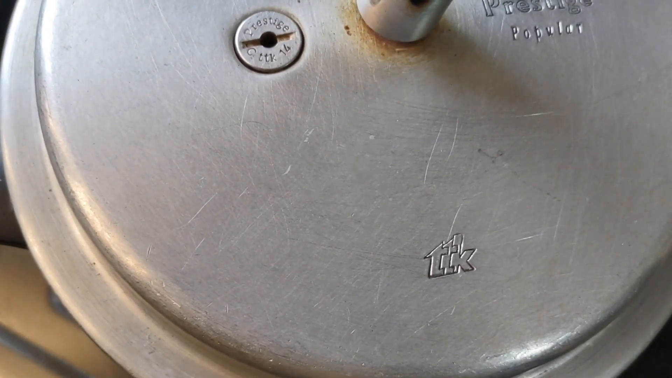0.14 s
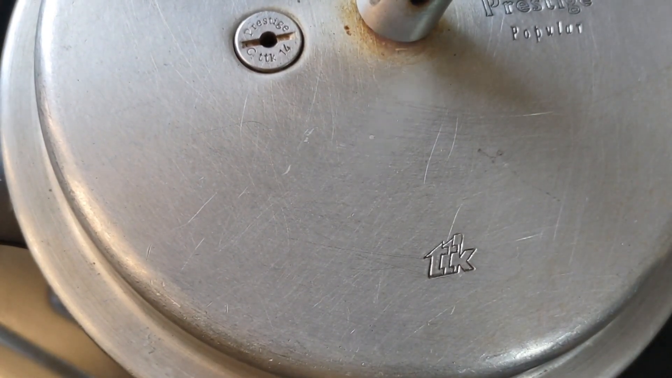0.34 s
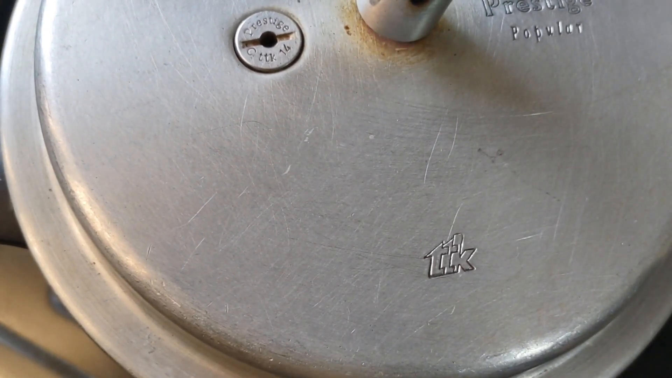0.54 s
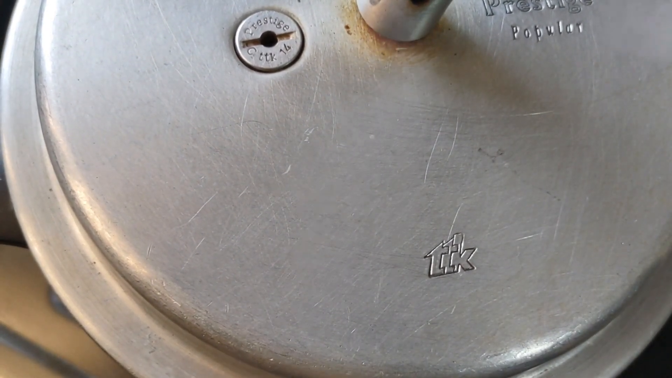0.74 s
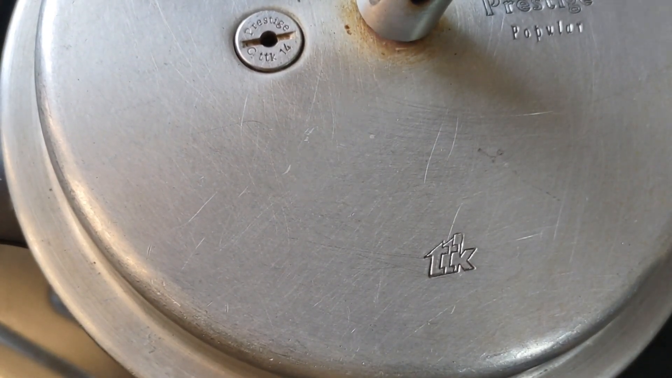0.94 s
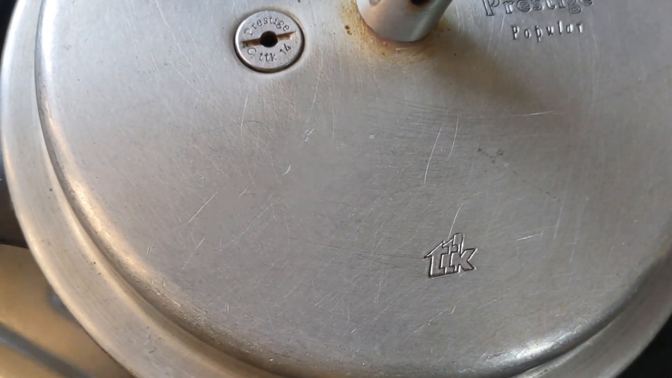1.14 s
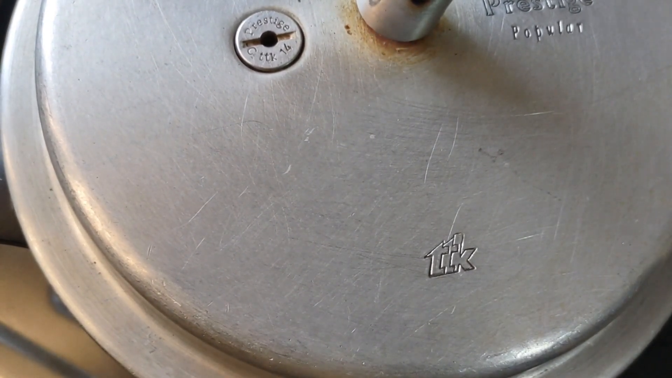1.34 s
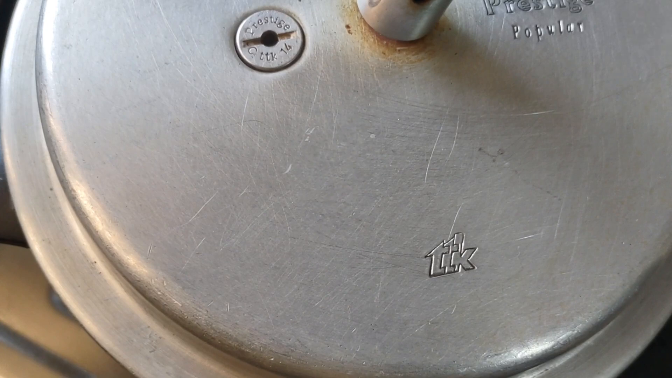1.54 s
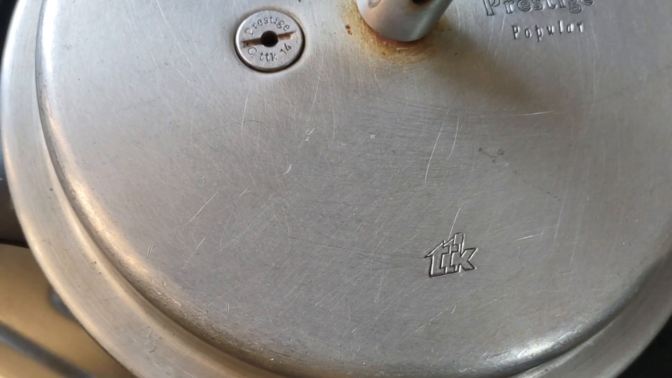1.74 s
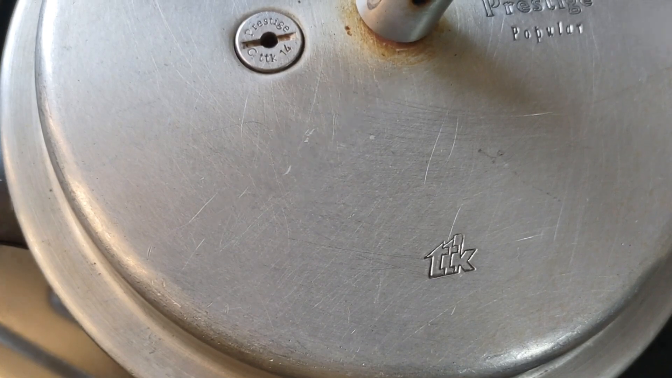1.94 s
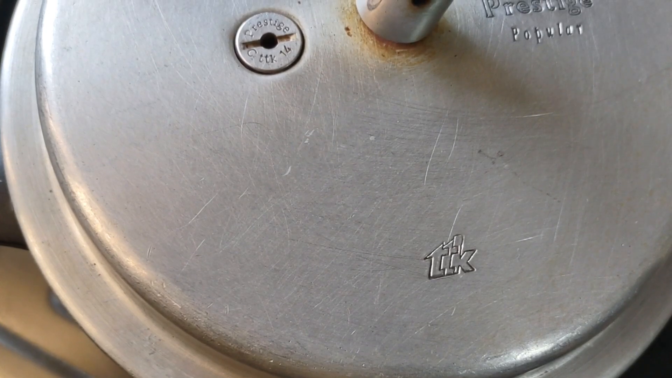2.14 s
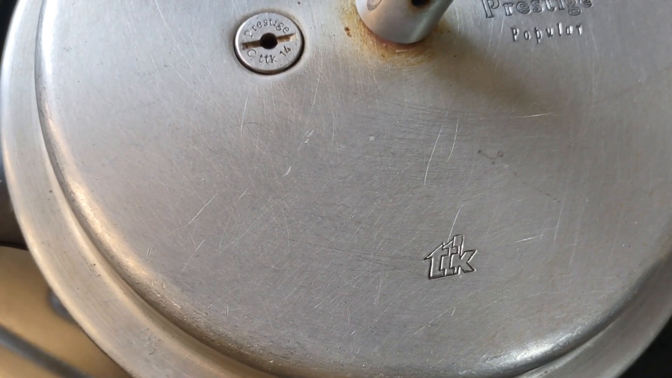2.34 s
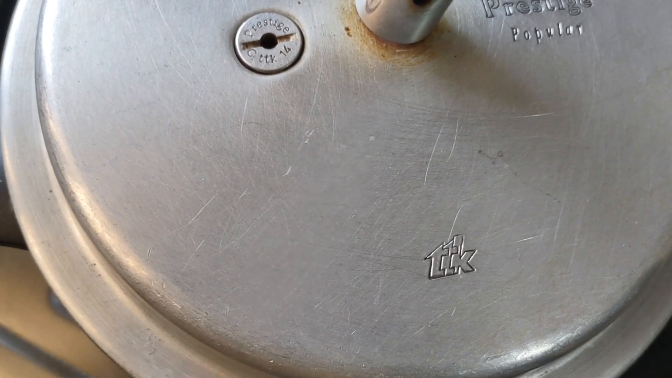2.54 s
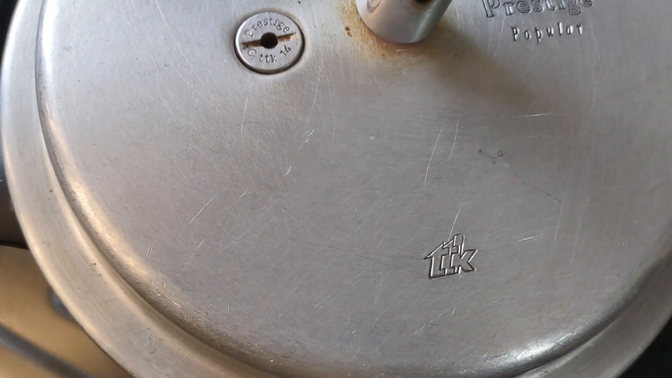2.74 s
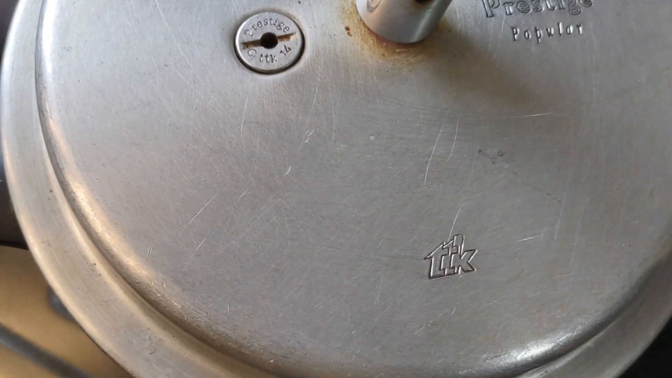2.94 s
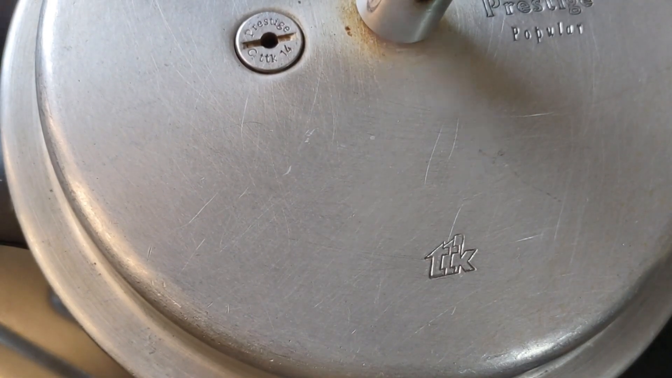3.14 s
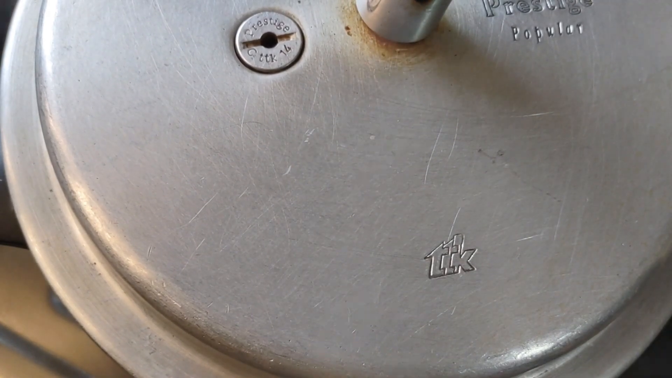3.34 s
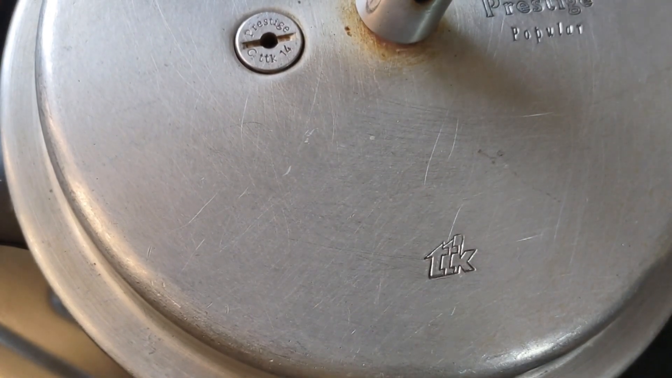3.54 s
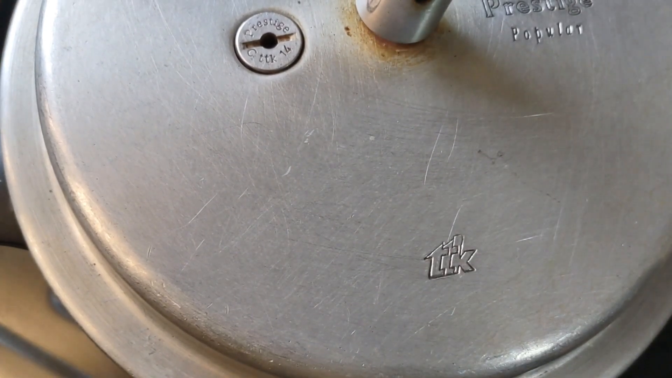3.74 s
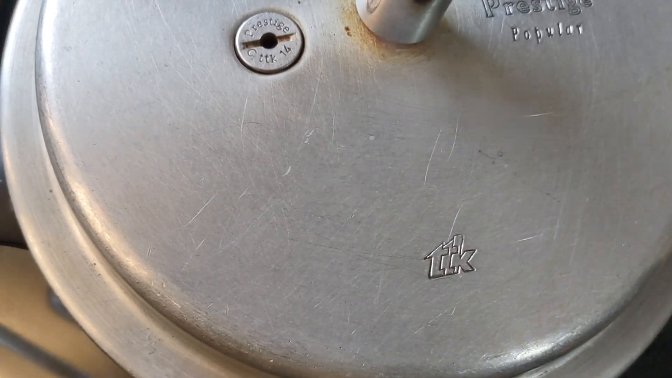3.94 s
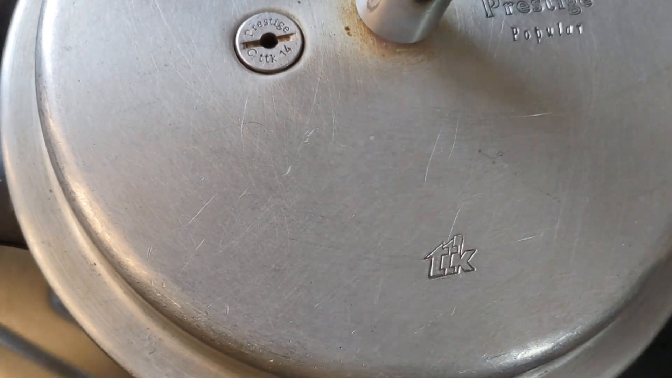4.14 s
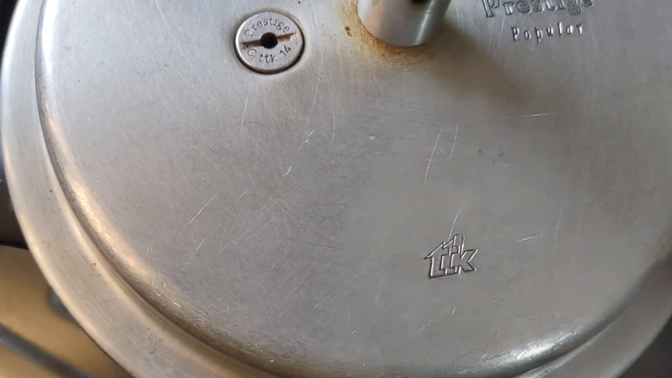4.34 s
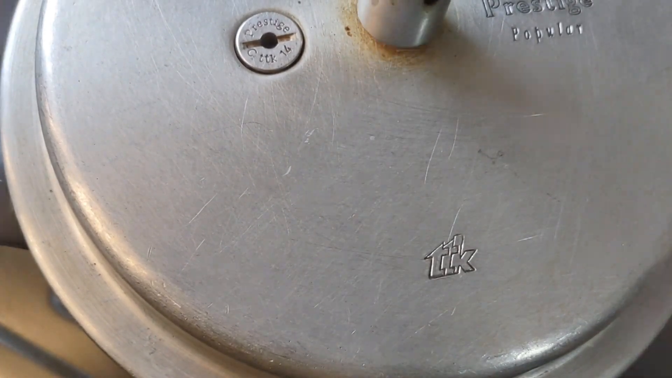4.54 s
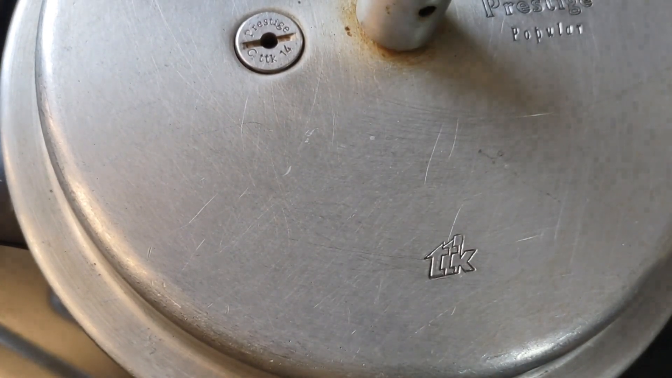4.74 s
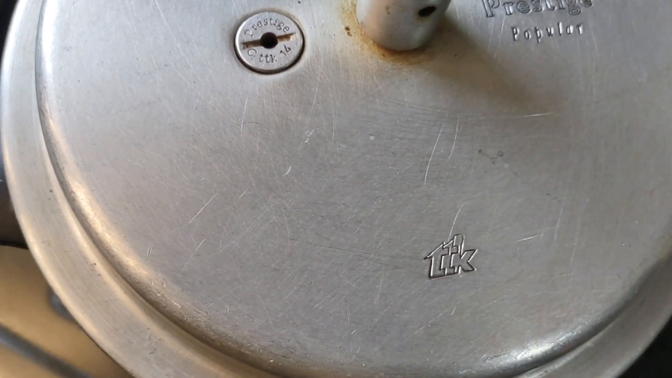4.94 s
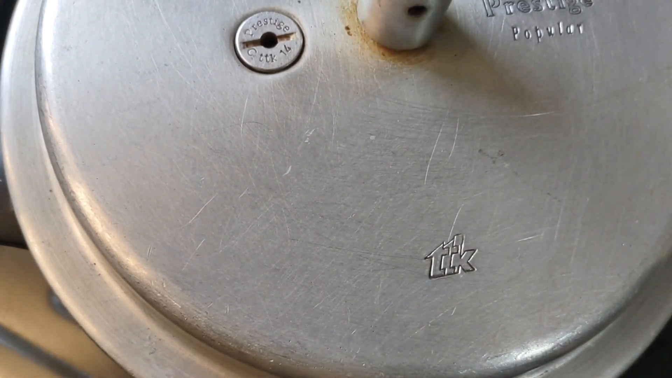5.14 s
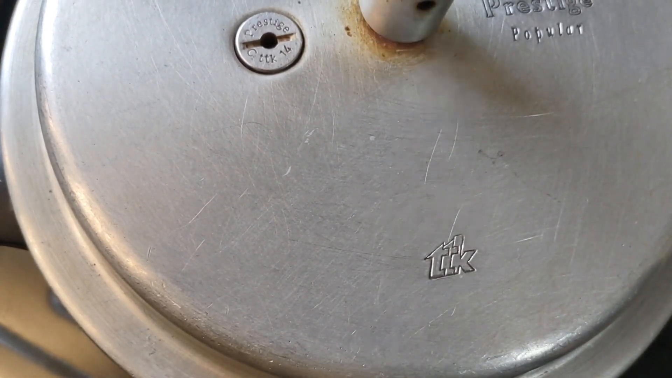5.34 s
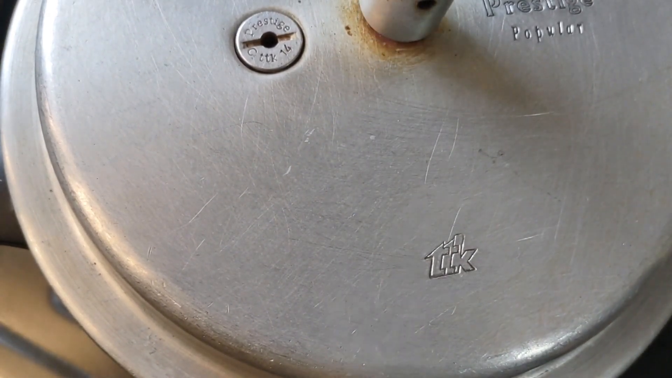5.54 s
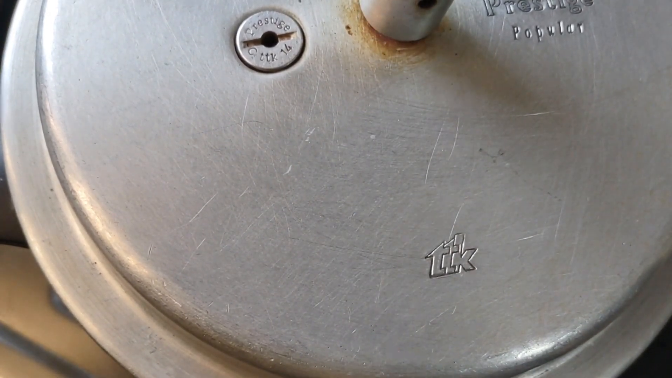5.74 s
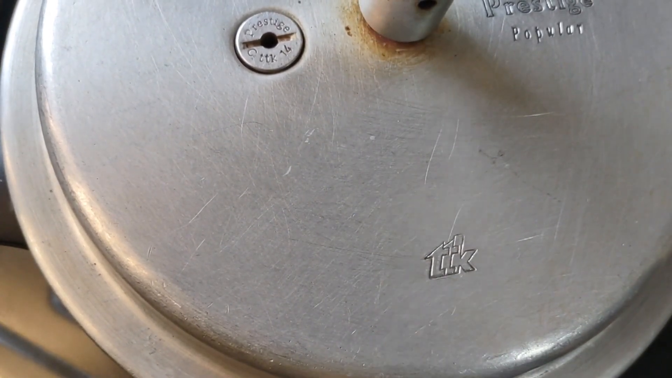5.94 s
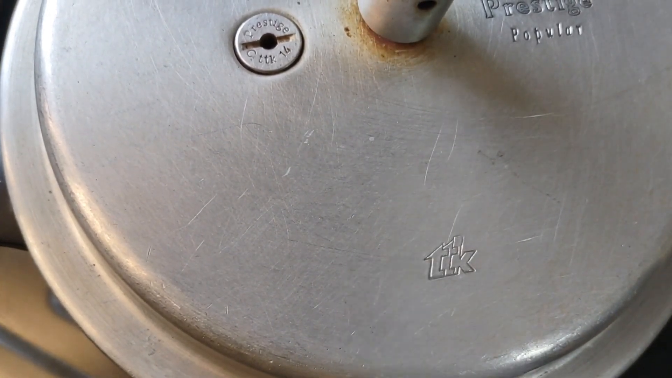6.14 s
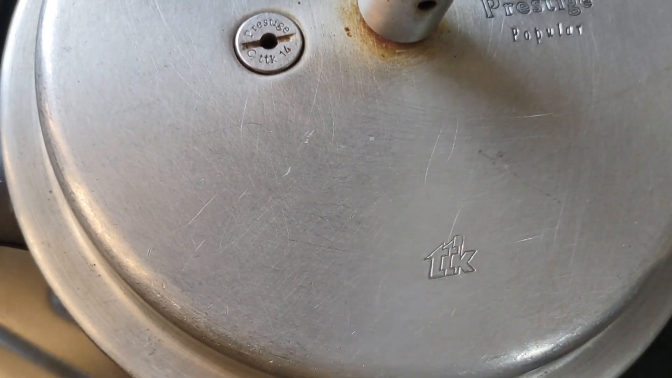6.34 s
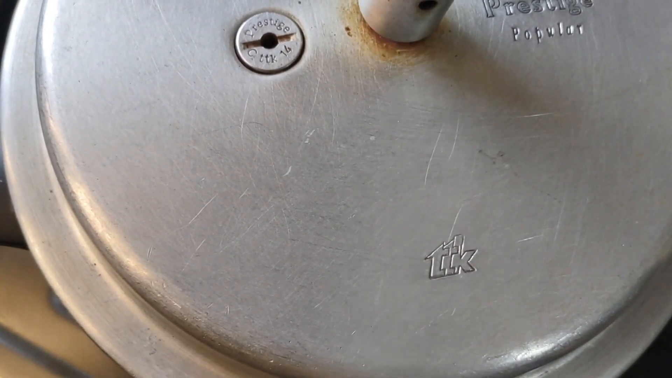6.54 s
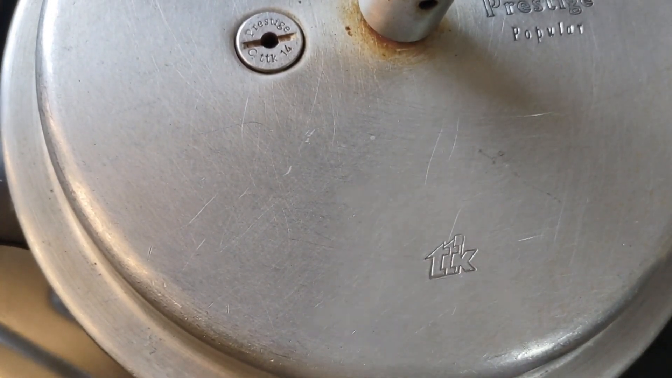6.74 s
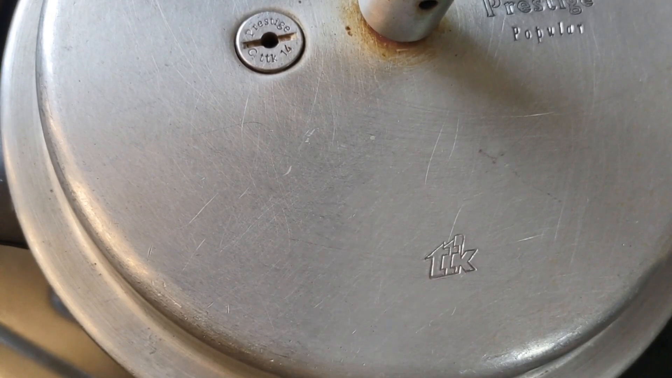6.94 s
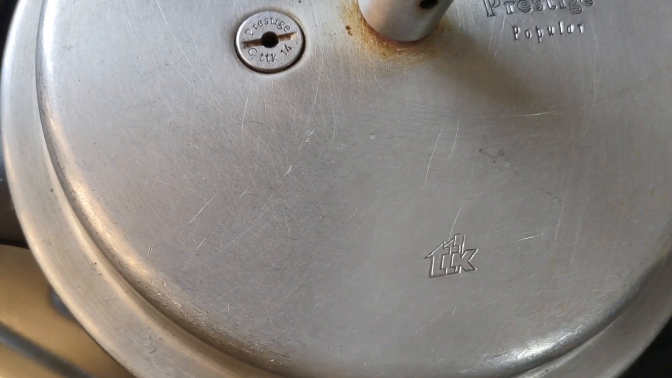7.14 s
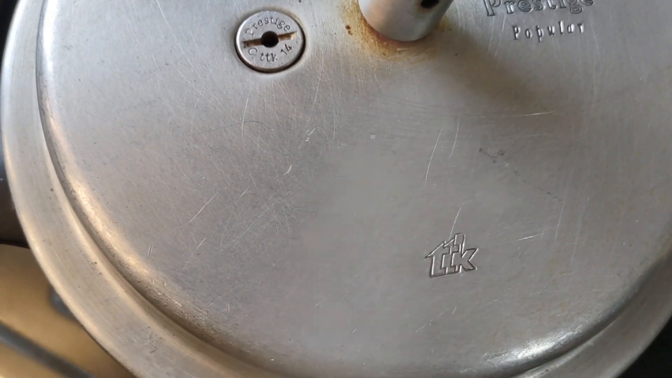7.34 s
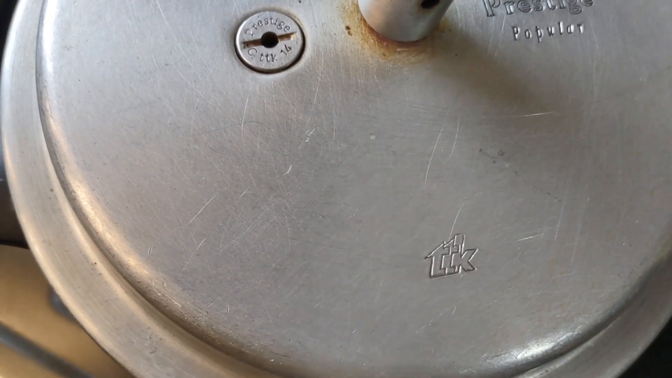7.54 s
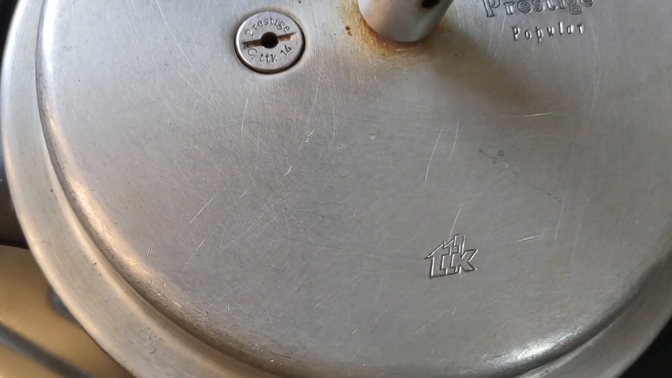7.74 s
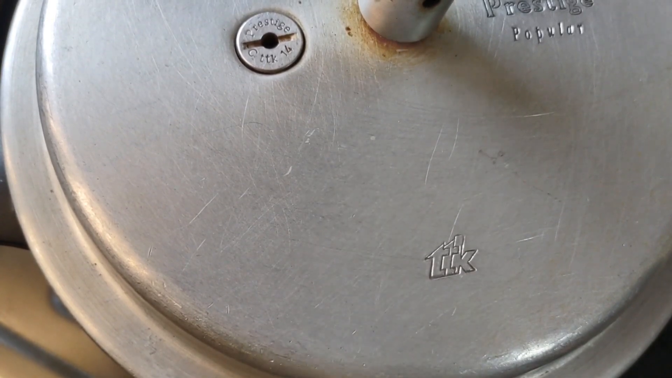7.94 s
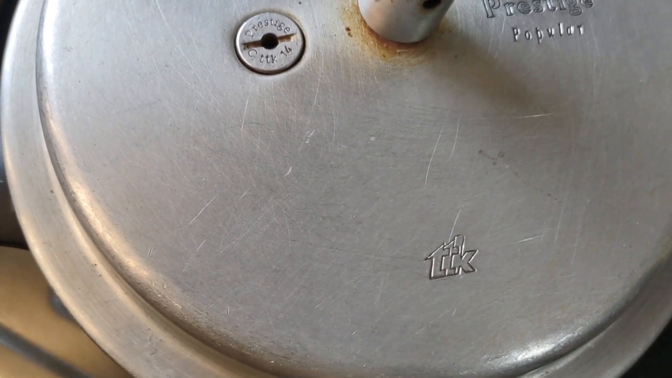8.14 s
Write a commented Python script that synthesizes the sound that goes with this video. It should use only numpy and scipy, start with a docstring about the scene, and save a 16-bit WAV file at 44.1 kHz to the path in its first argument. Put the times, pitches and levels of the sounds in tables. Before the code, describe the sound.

Close to a pressure cooker in a small hard-walled kitchen, steam roars loudly and steadily while low gusts bump the microphone. The roar gradually thins into a shrill, ringing hiss, then shuts off sharply with a soft hollow puff. A lull of about half a second holds only low stove and room rumble, before a fine leak hisses up and the full roar bursts back until the end.

```python
"""A broad steam roar, bumped by stray gusts, thins to a shrill hiss and falls away with a hollow puff. The
sound goes quiet for a moment; then a fine leak builds and the roar bursts back: a pressure cooker in a small
kitchen. Steam is shaped noise: the gap under the weight trades roar for hiss and ringing, a vent envelope
chokes it. Gusts are short low noise bumps, the stove and room a low rumble; hard walls add a short dense tail."""
import sys
import numpy as np
from scipy import signal
from scipy.fft import rfft, irfft
from scipy.io import wavfile

SR = 44100
rng = np.random.default_rng(int(sys.argv[2]) if len(sys.argv) > 2 else 0)


def wav_out(sig):
    """Save sig, one row per channel (or a flat mono array), as 16-bit PCM at SR to the path in sys.argv[1]."""
    wavfile.write(sys.argv[1], SR, np.round(np.clip(np.atleast_2d(sig).T, -1, 1) * 32767).astype(np.int16))


N = 365148
TIME = np.arange(N) / SR
FREQ = np.arange(N // 2 + 1) * SR / N + 1e-3  # offset keeps log finite
SIDES = np.array([[1], [-1]]) / 2  # splits a left-minus-right dB between the two ports
SHUT_S, OPEN_S = 4.712, 5.405  # weight drops, weight pops up


def undb(db):
    """Decibels to gain."""
    return 10 ** (np.asarray(db) / 20)


def curve(rows):
    """Time table interpolated to every sample."""
    time_s, value = np.transpose(rows)
    return np.interp(TIME, time_s, value)


def colour(points):
    """Spectral gain from (frequency [Hz], level [dB]) points, linear in log frequency."""
    hz, db = np.transpose(points)
    return undb(np.interp(np.log(FREQ), np.log(hz), db))


def bell(hz, width_hz):
    """Shape of one resonance, 1 at its centre, about width_hz wide at half power."""
    return 1 / (1 + ((FREQ - hz) / (.75 * width_hz)) ** 2)


def ringing(modes):
    """Gain of a set of resonances alone."""
    return sum(undb(db) * bell(hz, width_hz) for hz, width_hz, db in modes)


def lift(modes):
    """Gain of gentle resonances on an otherwise flat response."""
    return undb(sum(db * bell(hz, width_hz) for hz, width_hz, db in modes))


def filtered(x, gain):
    """Apply a spectral gain."""
    return irfft(rfft(x) * gain, N)


def turbulence(gain):
    """Coloured noise, unrelated at the two ports; their mean has rms 1."""
    x = filtered(rng.standard_normal((2, N)), gain)
    return x / np.std(x.mean(axis=0))


def walk(rate_hz):
    """Smooth random wander up to about rate_hz, spread 1."""
    x = filtered(rng.standard_normal(N), 1 / (1 + (FREQ / rate_hz) ** 2))
    return x / np.std(x)


def swell(peak_s, attack_s, release_s):
    """Envelope that grows and dies exponentially, 1 at its peak."""
    return np.exp(-np.maximum((peak_s - TIME) / attack_s, (TIME - peak_s) / release_s))


def hump(centre_s, width_s):
    """Gaussian rise and fall, 1 at its centre."""
    return np.exp(-((TIME - centre_s) / width_s) ** 2)


# rumble spectrum: (frequency [Hz], relative level [dB])
RUMBLE_SPECTRUM = [(25, -23), (60, -7), (100, 2), (200, -7), (320, -11), (400, -10), (600, -12),
                   (1000, -13.5), (3000, -24), (6000, -34), (15000, -51)]
# low room resonances, also coupled to the jet: (frequency [Hz], width [Hz], lift [dB])
ROOM_RESONANCES = [(169, 30, 0.5), (253, 32, 7), (378, 41, 7.5), (562, 55, 8.5)]
# air stirred by each blast: (peak time [s], level [dB])
STIRRED_AIR = [(0, -40.5), (5.55, -44.5)]


def rumble(level_db=-54, wander_db=0.5, stir_s=.1, settle_s=0.88):
    """Low noise of the stove and the room, stronger while a fresh blast stirs the air."""
    noise = turbulence(colour(RUMBLE_SPECTRUM) * lift(ROOM_RESONANCES))
    stirred = sum(undb(db) * swell(at_s, stir_s, settle_s) for at_s, db in STIRRED_AIR)
    return noise * (undb(level_db) + stirred) * undb(wander_db * walk(6))


# gusts: (time [s], level at left port [dB], length [s], centre [Hz])
GUST_BUMPS = [(0.0, -28, .03, 95), (0.06, -26.5, 0.024, 90), (0.136, -33, .029, 185),
              (0.197, -25.5, 0.026, 140), (0.287, -30, .033, 140), (0.507, -28, 0.019, 100),
              (0.608, -24, 0.027, 144), (0.801, -26, .015, 165), (0.956, -28.5, 0.042, 131),
              (1.015, -33, 0.032, 100), (1.095, -32, .03, 95), (2.66, -37, 0.047, 110),
              (4.017, -28, 0.039, 112), (4.567, -38, .07, 95), (5.809, -34, 0.032, 135)]


def gusts(band_ratio=1.49, right_db=-11):
    """Moving air bumps the microphone: short low-band noise, mostly on the left port."""
    out = np.zeros((2, N))
    for start_s, db, length_s, hz in GUST_BUMPS:
        first = int(start_s * SR)
        age = TIME[:SR // 2] / (length_s / 2)  # in units of half the length
        band = signal.butter(2, [hz / band_ratio, hz * band_ratio], "band", fs=SR, output="sos")
        puffed = rng.standard_normal((2, len(age))) * age * np.exp(1 - age)
        air = signal.sosfilt(band, puffed)
        # level = mean power over the gust length
        rms = np.sqrt(np.sum(air ** 2, axis=1, keepdims=True) / (length_s * SR))
        out[:, first:first + len(age)] += undb(db) * air / rms
    return out * undb([[0], [right_db]])


def kitchen(x, t60_s=0.18, treble_t60_s=0.038, split_hz=5000, wet_db=-9):
    """Hard walls close by add a short dense tail, different at each port; its treble dies first."""
    size = SR // 2
    age_s, noise = TIME[:size], rng.standard_normal((2, size))
    decay = undb(-60 * age_s / t60_s)
    low = signal.sosfilt(signal.butter(2, split_hz, fs=SR, output="sos"), noise)
    high = signal.sosfilt(signal.butter(2, split_hz, "high", fs=SR, output="sos"), noise[::-1])
    tail = low * decay + high * undb(-60 * age_s / treble_t60_s)
    tail = tail * (age_s > .003) / np.sqrt(np.sum(decay ** 2))
    return x + undb(wet_db) * signal.fftconvolve(x, tail, axes=1)[:, :N]


# leak spectrum: (frequency [Hz], relative level [dB])
LEAK_SPECTRUM = [(200, -26), (1200, -18), (2700, -11), (4000, -10.5), (4800, -9), (6300, 0.5), (7600, -5.5),
                 (8900, 0.5), (10800, -6.5), (13000, -6.5), (15500, -6)]
# breathy tone of the seat: (frequency [Hz], width [Hz], relative level [dB])
SEAT_TONE = [(3450, 200, 0)]


def leak(start_s=5.105, creep_db=-33.3, spit_db=-36, lift_off_db=-24, pan_db=-4.0, tone_db=-14):
    """Steam creeps through the closed seat: it spits, sags, and builds until the weight lifts."""
    seep = turbulence(colour(LEAK_SPECTRUM)) * undb(pan_db * SIDES)
    tone = turbulence(ringing(SEAT_TONE)) * undb(tone_db) * hump(5.17, width_s=0.062)
    creep = undb(creep_db) * swell(start_s, attack_s=.005, release_s=.6) * (TIME < OPEN_S)
    spit = undb(spit_db) * swell(start_s, attack_s=.005, release_s=.015)
    lift_off = undb(lift_off_db) * swell(OPEN_S - 0.013, attack_s=.045, release_s=0.024)
    sputter_db = 1.0 * walk(30)
    return (seep + tone) * (creep + spit + lift_off) * undb(sputter_db)


# hollow of the weight: (frequency [Hz], width [Hz], relative level [dB])
HOLLOW_RESONANCES = [(850, 83, 1), (1370, 140, -1), (1960, 150, -9)]


def puff(level_db=-27, pan_db=3, delay_s=0.023):
    """The last steam rings the hollow of the weight as it drops."""
    envelope = swell(SHUT_S + delay_s, attack_s=.018, release_s=0.022)
    return turbulence(ringing(HOLLOW_RESONANCES)) * envelope * undb(level_db + pan_db * SIDES)


def vent(shut_db_per_s=420, open_db_per_s=720):
    """Steam gain: full, choked as the weight drops, full again once it pops up."""
    closing = undb(-shut_db_per_s * np.maximum(TIME - SHUT_S, 0))
    opening = undb(-open_db_per_s * np.maximum(OPEN_S - TIME, 0))
    return np.maximum(closing, opening)


# flow through the vent: (time [s], level [dB])
FLOW_LEVEL = [(0.2, 0), (1.2, -0.3), (2.2, .4), (2.45, -0.1), (3.28, -0.5), (3.45, 0.5), (3.9, -1.2),
              (4.65, 0.2), (5.6, 0), (6.9, .2), (7.2, -.7), (7.65, .4)]
# short surges of steam: (time [s], extra level [dB])
STEAM_SURGES = [(0.82, 1.5), (1.56, 0.8), (2.22, 2), (2.28, 1), (2.78, 1), (2.85, 1), (3.37, 1),
                (4.45, 1.8), (4.67, 0.5), (5.425, 2), (6.84, 2.4), (6.92, 2), (7.7, 2.8), (7.96, 1.5)]


def flow_db(surge_width_s=0.015, flutter_db=0.5):
    """Flow strength: the weight rocks on its seat and shakes the whole flow."""
    surges = sum(db * hump(at_s, surge_width_s) for at_s, db in STEAM_SURGES)
    return curve(FLOW_LEVEL) + surges + flutter_db * walk(11.6)


# jet spectra: (frequency [Hz], relative level [dB])
ROAR_SPECTRUM = [(30, -40), (90, -20), (230, -14.5), (330, -17), (600, -12.5), (1100, -7.5), (2000, -4),
                 (3000, 0.5), (5000, 0), (7900, 1), (8700, -7), (11000, -17), (13500, -17.5),
                 (15700, -13.5)]
HISS_SPECTRUM = [(60, -25), (500, -20.5), (1000, -17), (2000, -9.5), (3300, -3), (5200, -1), (6500, 1),
                 (7600, 1.5), (8600, -6.5), (10400, -9), (11200, -13), (13500, -14), (15700, -10.5)]
# weight and lid, gap ringing, top sizzle: (frequency [Hz], width [Hz], level [dB])
BODY_RESONANCES = [(820, 87, 3), (1284, 170, 2.5), (1807, 163, 4.5), (2280, 70, 3.5), (2500, 58, 3.5),
                   (3220, 140, 1.5)]
GAP_RINGING = [(4530, 200, -13), (5260, 200, -9), (6400, 240, 0.5), (6780, 480, 1.5), (7450, 260, -9),
               (9600, 770, -11), (10200, 450, -9)]
SIZZLE_BANDS = [(14300, 400, -9), (15350, 650, 0)]
# top sizzle: (time [s], level [dB])
SIZZLE_CURVE = [(0, -52), (2.6, -56), (3.05, -38), (3.6, -31), (3.88, -44), (4.3, -45), (4.7, -65),
                (5.9, -62), (6.4, -43), (8.28, -50)]
# height of the weight on the steam: (time [s], opening [0-1])
GAP_OPENING = [(0.2, .99), (0.7, 0.85), (1.7, 0.76), (2.3, 0.6), (2.65, .5), (3.08, 0.12), (3.6, 0.18),
               (3.9, 0.33), (4.3, 0.14), (4.5, 0.01), (5.37, 0.23), (5.44, 0.95), (6.9, 0.81), (7.2, .62),
               (8.28, 0.63)]
# lean of the jet: (frequency [Hz], left minus right [dB])
JET_LEAN = [(120, 3), (320, -1.5), (800, 2.5), (1600, 4), (3000, 3), (6000, 0), (8000, -1.5), (9300, -4),
            (12000, 0.5), (15500, -3)]
# the turning weight swings its ports: (time [s], left minus right [dB])
PORT_SWING = [(0, 1), (2.3, 1), (3.1, 0.7), (4.5, 1), (5.5, -0.7), (8.28, -.5)]


def jet(roar_db=-15.5, hiss_db=-18.5, ring_db=-21, ring_fade_db=31.5, ring_flutter_db=1.3,
        room_share=.2, throb_db=1.1, throb_hz=2200):
    """Steam through the open vent: broad roar, thin hiss and the ringing of the narrow gap."""
    lean = colour(JET_LEAN) ** SIDES
    gap = curve(GAP_OPENING)
    body = lift(BODY_RESONANCES) * lift(ROOM_RESONANCES) ** room_share
    roar = turbulence(colour(ROAR_SPECTRUM) * body * lean) * gap ** 0.67
    roar = roar * undb(roar_db + .55 * walk(18))
    hiss = turbulence(colour(HISS_SPECTRUM) * body * lean) * (1 - gap) ** 0.47 * undb(hiss_db)
    # ring_fade_db is the loss at full opening
    ring_level_db = ring_db - ring_fade_db * gap + ring_flutter_db * walk(17)
    ring = turbulence(ringing(GAP_RINGING)) * undb(ring_level_db)
    sizzle_db = curve(SIZZLE_CURVE) + ring_flutter_db * walk(9)
    sizzle = turbulence(ringing(SIZZLE_BANDS) * lean) * undb(sizzle_db)
    steam = roar + hiss + ring + sizzle
    # large eddies come and go: the low part throbs more than the top
    eddies = filtered(steam, 1 / (1 + (FREQ / throb_hz) ** 4))
    steam = steam + eddies * (undb(throb_db * walk(35)) - 1)
    return steam * vent() * undb(flow_db() + curve(PORT_SWING) * SIDES)


def scene():
    """Rumble and gusts, then the cooker with its wall reflections."""
    return rumble() + gusts() + kitchen(leak() + puff() + jet())


def record(dry, top_hz=15700):
    """The sound drops out for an instant in the lull; peaks clip and the top is cut."""
    dropout = np.interp(TIME, [5.065, 5.067, 5.09, 5.1], [1, 0, 0, 1])
    low_pass = signal.ellip(12, .1, 70, top_hz, fs=SR, output="sos")
    return signal.sosfilt(low_pass, np.clip(dry * dropout, -1, 1))


dry = scene()
out = record(dry)
wav_out(out)
```